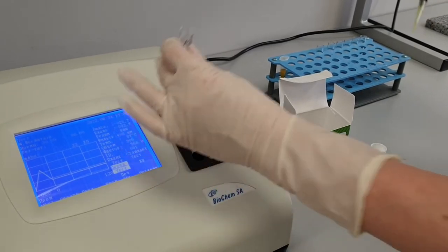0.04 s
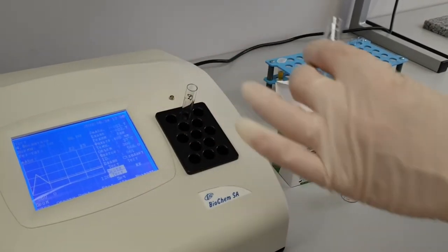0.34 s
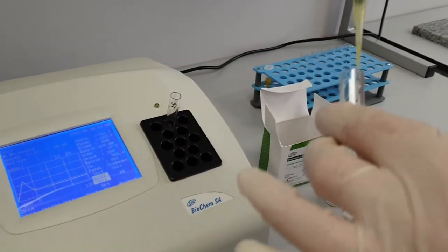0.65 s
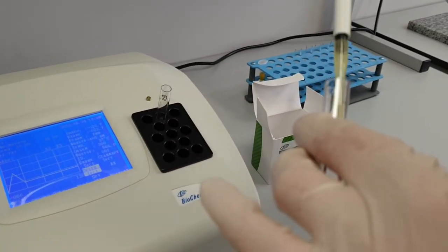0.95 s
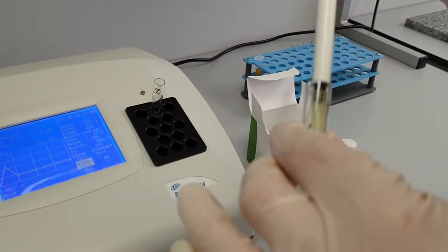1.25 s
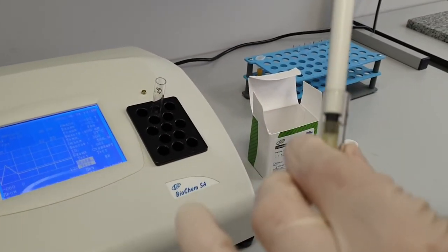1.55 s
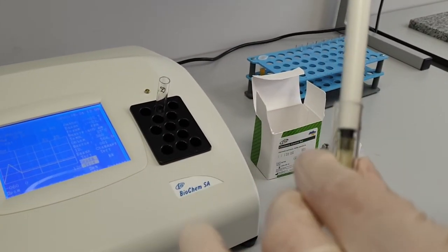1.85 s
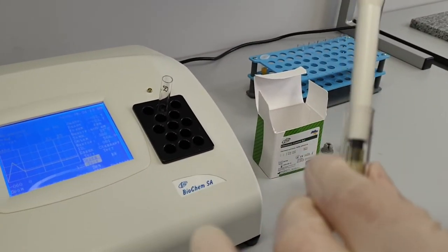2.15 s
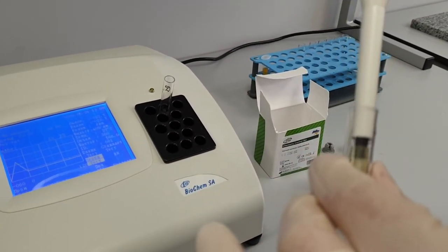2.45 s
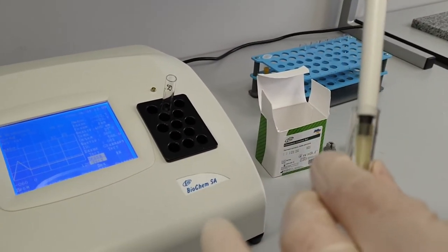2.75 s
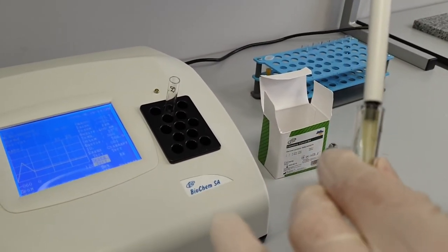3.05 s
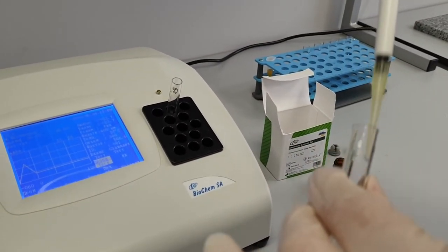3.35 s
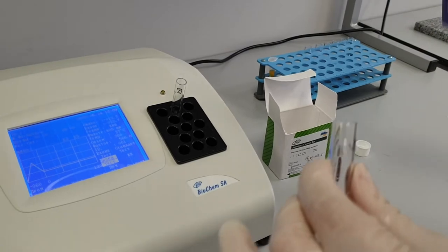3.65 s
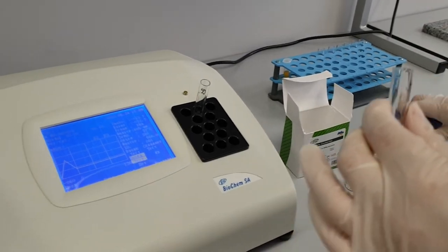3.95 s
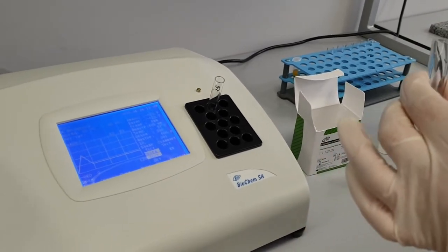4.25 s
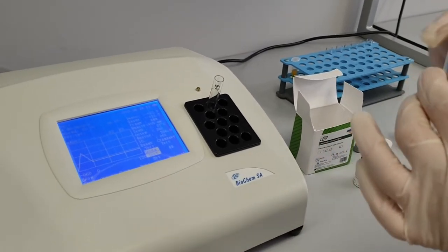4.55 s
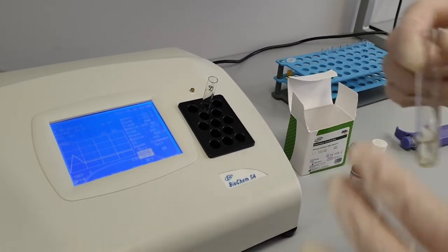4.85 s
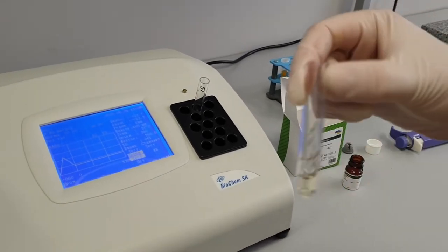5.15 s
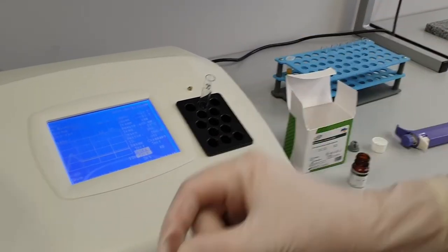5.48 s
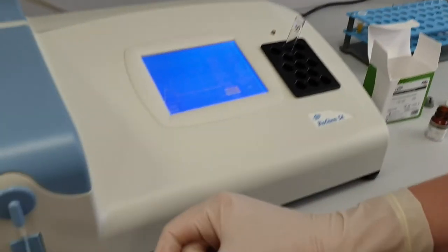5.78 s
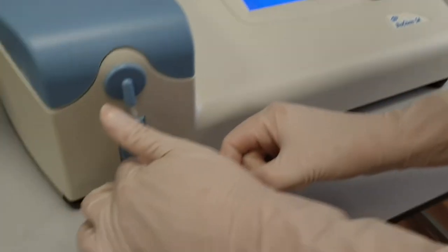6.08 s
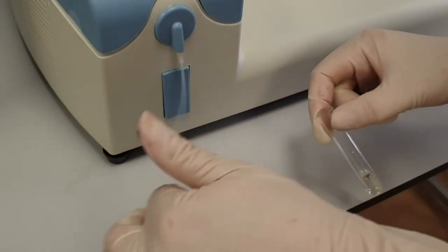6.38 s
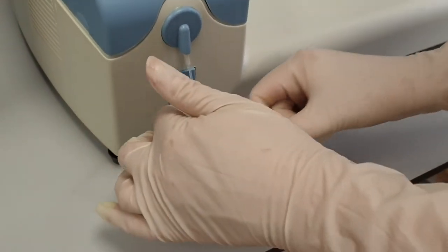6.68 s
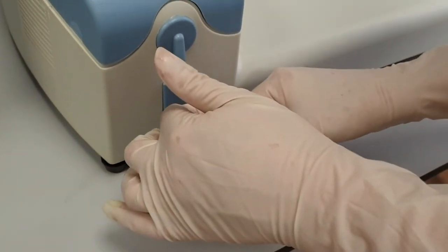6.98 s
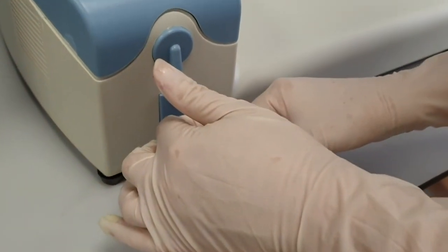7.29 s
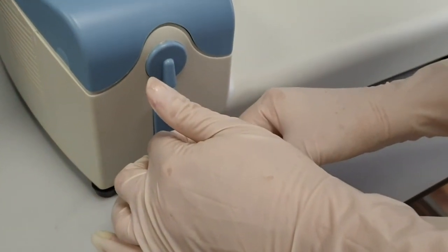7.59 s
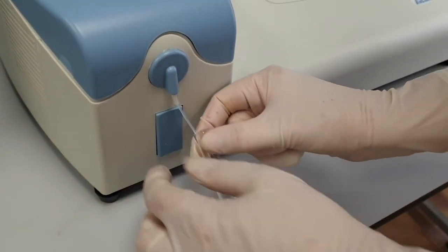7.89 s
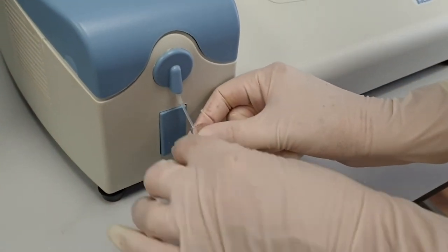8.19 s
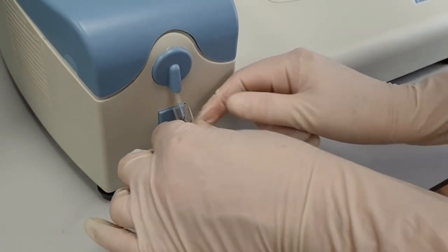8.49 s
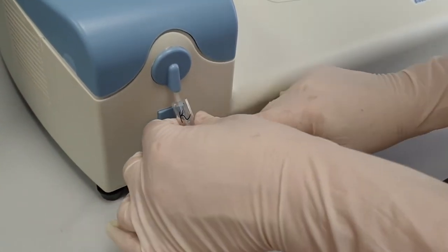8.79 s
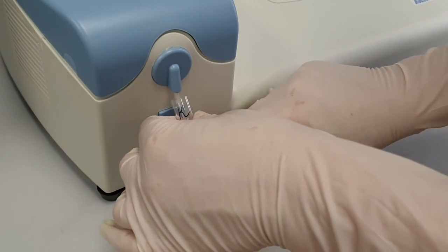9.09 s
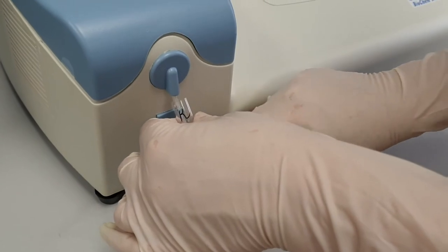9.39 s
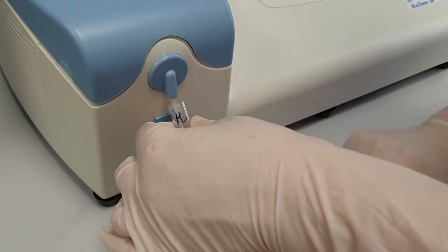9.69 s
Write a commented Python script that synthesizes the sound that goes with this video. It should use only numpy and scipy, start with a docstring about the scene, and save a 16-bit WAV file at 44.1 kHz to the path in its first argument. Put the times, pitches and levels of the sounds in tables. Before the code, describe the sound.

A laboratory analyser hums steadily over its fan in a small, hard room. Sleeves swish and a glass tube tinks faintly. A plastic pipette clicks several times, then drops on the bench with a sharp clatter, the loudest sound. Soft arm bumps and faint latex rubbing follow, with a knock on the machine's plastic casing and a cluster of knocks near the end, all close to a stereo microphone.

```python
"""A pipette in gloved hands at a laboratory bench, close to a stereo microphone in a small, hard room.
It touches a glass tube, its plunger clicks and it drops on the bench; later the tube and fingers knock on
an analyser's plastic casing. Each blow is a brief clatter plus the object's ring, and the walls answer.
Sleeves swish and latex rubs by friction; behind it all the analyser's motor hums over its fan."""
import sys
import numpy as np
from scipy import signal
from scipy.fft import rfft, irfft, next_fast_len
from scipy.io import wavfile
from scipy.ndimage import uniform_filter1d

SR = 44100
rng = np.random.default_rng(int(sys.argv[2]) if len(sys.argv) > 2 else 0)


def wav_out(sig):
    """Save sig, one row per channel (or a flat mono array), as 16-bit PCM at SR to the path in sys.argv[1]."""
    wavfile.write(sys.argv[1], SR, np.round(np.clip(np.atleast_2d(sig).T, -1, 1) * 32767).astype(np.int16))


N = 429093
TIME = np.arange(N) / SR
IMPACT_GAIN = np.sqrt(SR / 100)  # gives a unit-energy sound the energy of 10 ms at unit power

# the pipette on the bench, close to the microphone: start_s, level_db, cutoff_hz
PIPETTE_LANDINGS = [(4.1572, -37, 850), (4.168, -38, 539), (4.2115, -14.5, 15000), (4.42, -54, 493)]
# the bench top's clatter: frequency_hz, level_db
BENCH_CLATTER = [(80, -23), (170, -3.5), (450, -3), (800, -1), (1700, -3), (2400, -5), (4600, -10.5),
                 (6200, -14.5), (11500, -18), (16000, -23.5)]
# its ring: pitch_hz, level_db, t60_s
BENCH_RING = [(143, -14, 0.21), (290, -7.5, 0.11), (415.2, 0.5, 0.12), (589, -10.5, .07),
              (836, -0.5, 0.083), (927, -7, 0.064), (1480, -8, .07), (1683, -4.5, .08), (4650, -9, .03)]
def pipette_drop():
    """The pipette lands on the bench top and rocks to rest."""
    return blows(PIPETTE_LANDINGS, BENCH_CLATTER, BENCH_RING, low_t60=0.061, high_t60=0.042, rise_s=.001,
                 ring_pan_db=0.5, ring_db=-2.5, soft_ring_db=13.5, dulling_db=0.54, room_db=-6.0)


# plunger clicks and light taps of plastic, close up: start_s, level_db, cutoff_hz
PLUNGER_CLICKS = [(0., -48.5, 3780), (1.106, -66, 8000), (1.229, -62.5, 5500), (1.5116, -64, 15000),
                  (3.2766, -55, 8500), (3.3416, -53, 9400), (3.397, -49.5, 15000), (3.4661, -31.5, 15000),
                  (4.0852, -49.5, 14100), (4.1298, -51.5, 13500), (4.158, -37.5, 13500),
                  (6.3853, -38.5, 13200), (8.3465, -58, 16060), (8.5171, -56.5, 13000), (9.1012, -46, 4120)]
# the pipette's clatter: frequency_hz, level_db
PIPETTE_CLATTER = [(150, -20), (650, -10.5), (1000, -14.5), (2300, -4.5), (6000, -0.5), (9500, -6),
                   (12500, -2.5), (16000, -8.5)]
# its ring: pitch_hz, level_db, t60_s
PIPETTE_RING = [(1350, 1, 0.045), (2260, -1.5, 0.18), (2436, 1, .2), (2640, 0, 0.29), (3430, -5.5, 0.042),
                (4920, 1.5, .04), (5710, 0, .05)]
def pipette_clicks():
    """Small plastic parts strike with a bright snap and a faint ring."""
    return blows(PLUNGER_CLICKS, PIPETTE_CLATTER, PIPETTE_RING, low_t60=.055, high_t60=.034,
                 rise_s=0.00033, ring_pan_db=-1.5, ring_db=-12, soft_ring_db=0.5, dulling_db=2.5,
                 room_db=-8.5)


# knocks on the analyser beside the hands: start_s, level_db, cutoff_hz
CASING_KNOCKS = [(5.953, -55, 1700), (6.389, -36.5, 1004), (9.1015, -47, 1800), (9.3465, -28.5, 13500),
                 (9.488, -41, 700), (9.4915, -40, 11900), (9.537, -47.5, 500)]
# the casing's clatter: frequency_hz, level_db
CASING_CLATTER = [(70, -19), (300, -3.5), (580, -7), (780, 0.5), (1750, -0.5), (2100, -9), (3400, -9.5),
                  (4900, -18.5), (7300, -6.5), (9000, -16), (11500, -11.5), (16000, -28)]
# its ring: pitch_hz, level_db, t60_s
CASING_RING = [(167, -16, 0.24), (327, -32, .1), (374, -1, 0.11), (413.2, 2, 0.14), (797, -2, 0.12),
               (880, -5.5, 0.041), (955, -8, 0.042), (1800, -6.5, 0.07)]
def casing_knocks():
    """Tube and fingers set the analyser's plastic casing ringing."""
    return blows(CASING_KNOCKS, CASING_CLATTER, CASING_RING, low_t60=0.14, high_t60=0.042, rise_s=0.0006,
                 ring_pan_db=2, ring_db=-2.5, soft_ring_db=5, dulling_db=0.35, room_db=-7.0)


# where the hands work, seen from the microphone: time_s, left_minus_right_db
HAND_POSITION = [(3.5, -1), (4.2, 1), (8.5, 3), (9.4, -1.5)]
SOFT_HZ, HARD_HZ = 503, 14000  # contact cut-offs: a soft one favours the ring, a hard one adds no tilt
FAINT_WETNESS = .13  # dB more room for each dB that a blow is fainter
def blows(hits, colour, modes, low_t60, high_t60, rise_s, ring_pan_db, ring_db, soft_ring_db,
          dulling_db, room_db):
    """Each blow is a clatter, dying first in the treble, plus a ring; returns (direct, sent to room)."""
    direct, sent = np.zeros((2, 2, N))
    loudest_db = max(hit[1] for hit in hits)
    for start_s, db, cutoff_hz in hits:
        tilt_db = dulling_db * np.log2(cutoff_hz / HARD_HZ)
        ring_gain = undb(ring_db + soft_ring_db * (SOFT_HZ / cutoff_hz) ** 2)
        def force_db(hz):
            """A soft, long contact wakes the high modes less."""
            return tilt_db * np.log2(hz) - 10 * np.log10(1 + (hz / cutoff_hz) ** 8)
        t60s = [(400, low_t60), (4000, high_t60)]
        clatter = dying_noise(lambda hz: along(colour, hz) + force_db(hz), t60s)
        tone = ring([(hz, mode_db + force_db(hz), t60) for hz, mode_db, t60 in modes])
        contact = onset(clatter, rise_s) * undb(db) * IMPACT_GAIN
        clatter *= contact
        tone *= contact * ring_gain * panned(ring_pan_db)
        pan_db = np.interp(start_s, *np.transpose(HAND_POSITION))
        add(direct, start_s, (clatter + tone) * panned(pan_db))
        # an object's loudest blows are nearest the microphone, so they are also the driest
        wet = undb(room_db + FAINT_WETNESS * (loudest_db - db))
        add(sent, start_s, from_all_sides(clatter) * wet)
        add(sent, start_s, tone * wet)
    return np.array([direct, sent])


# the tube, a little to the right, rising in pitch as it fills:
# start_s, pitch_hz, level_db, strongest_multiple
TUBE_TOUCHES = [(1.229, 1220, -57.5, 1), (3.116, 1270, -60.5, .6), (5.1429, 1426, -52.5, 5),
                (8.516, 1540, -74, 1)]
# its air column favours the odd overtones: pitch_multiple, level_db, t60_s
TUBE_OVERTONES = [(1, 1, 0.054), (2, -12, 0.033), (3, -5, 0.042), (5, -8, 0.028)]
TINK_FALL_DB = 8  # per octave away from the strongest multiple
def glass_tinks():
    """Fingers damp the tube, so each overtone of a tink is a brief, blurred cluster of close modes."""
    out = np.zeros((2, N))
    for start_s, pitch, db, strongest in TUBE_TOUCHES:
        modes = []
        for multiple, mode_db, t60 in TUBE_OVERTONES:
            overtone_db = mode_db - TINK_FALL_DB * abs(np.log2(multiple / strongest))
            for blur, blur_db in [(1, -3.5), (.97, -3), (1.035, -6.5)]:
                modes.append((pitch * multiple * blur, overtone_db + blur_db, t60))
        add(out, start_s, undb(db) * ring(modes))
    return out * panned(-2.5) * IMPACT_GAIN


# hands and forearms bumping the bench and casing: start_s, level_db, t60_s
ARM_BUMPS = [(0.339, -45, 0.19), (.49, -46, 0.17), (5.62, -42, 0.64), (5.96, -42, 0.13), (9.491, -33, 0.05)]
# their dull thud: frequency_hz, level_db
THUD_SPECTRUM = [(50, -30), (90, 8), (160, -1.5), (250, -0.5), (500, -16), (2000, -64)]
def arm_thumps():
    """Flesh on a heavy surface: only the lowest modes answer, and they start softly."""
    out = np.zeros((2, N))
    for start_s, db, t60 in ARM_BUMPS:
        thud = dying_noise(lambda hz: along(THUD_SPECTRUM, hz), [(100, t60)])
        add(out, start_s, undb(db) * thud * onset(thud, rise_s=0.0025))
    return out * IMPACT_GAIN


# sleeves moving near the microphone: peak_s, rise_s, fall_s, level_db
SLEEVE_SWEEPS = [(.35, 0.22, 0.19, -58.5), (.37, 0.026, .045, -55.5), (3.8, 0.21, 0.25, -67.5),
                 (4.847, 0.038, 0.039, -68), (5.2, .11, .11, -68), (5.62, 0.13, 0.3, -52.5),
                 (6.34, 0.12, .1, -58.5), (6.65, .15, 0.16, -69), (8.37, 0.059, 0.059, -64.5),
                 (8.537, 0.08, 0.098, -62.5)]
# the hiss of cloth: frequency_hz, level_db
CLOTH_SPECTRUM = [(70, 17), (250, 5.5), (600, 9), (1100, 3.5), (1800, 2), (2800, 0.5), (4500, 5), (7300, 8),
                  (9000, -2.5), (12500, 4.5), (16000, -4.5)]
SWISH_TILT_DB = -1.08  # per octave, for a slow sweep
FLICK_S, FLICK_TILT_DB = .07, 3  # a flick this short is brighter by this much per octave
def sleeves():
    """Cloth moves through the air in broad swishes, brighter when brisk."""
    out = 0
    for peak_s, rise_s, fall_s, db in SLEEVE_SWEEPS:
        tilt_db = SWISH_TILT_DB + FLICK_TILT_DB * (FLICK_S / (rise_s + fall_s)) ** 2
        colour = lambda hz: undb(along(CLOTH_SPECTRUM, hz) + tilt_db * np.log2(hz + 1))
        out += undb(db) * noise_swell(peak_s, rise_s, fall_s, colour, grain_db=0.5)
    return out


# the fading ring of a tapped glass tube (first two rows), then the pipette tip squeaking on the glass:
# peak_s, pitch_hz, level_db
GLASS_RING_AND_SQUEAKS = [(-.02, 3680, -58), (-.02, 7450, -69), (1.145, 3780, -71.5), (1.41, 7350, -73),
                          (1.565, 4480, -73.5)]
def glass_ring_and_squeaks():
    """The tube's ring and the tip's squeaks are narrow bands of noise that die away."""
    return narrow_swells(GLASS_RING_AND_SQUEAKS, rise_s=0.049, fall_s=0.12, width=.075, grain_db=3.0)


# the gloves, faint even this close: peak_s, pitch_hz, level_db
GLOVE_RUBS = [(4.644, 5900, -72), (5.068, 6000, -69), (7.974, 6560, -73), (8.282, 6800, -73),
              (8.57, 4600, -72.5), (8.74, 6300, -74.5), (9.75, 4700, -64.5)]
def gloves():
    """Latex rubs, catching and slipping as the grip changes."""
    return narrow_swells(GLOVE_RUBS, rise_s=.095, fall_s=.095, width=0.26, grain_db=2.0)


# the analyser's motor and overtones, just left of centre: pitch_hz, level_db
MOTOR_TONES = [(49.1, -49.5), (245.6, -63.5), (344.5, -68.5), (393, -68.5), (491.3, -65), (552, -80),
               (886, -79), (2363, -89.5), (2421, -93)]
# its fan and the ventilation: frequency_hz, level_db
FAN_SPECTRUM = [(25, -24), (65, -1), (100, -4.5), (150, -2.5), (270, -0.5), (370, -9), (560, -16),
                (980, -18), (1140, -29), (1370, -27), (1900, -33), (2600, -32.5), (4500, -36.5),
                (8800, -46), (12500, -36.5), (16000, -40)]
# the microphone moves round the analyser's side, which screens the overtones: time_s, gain_db
SIDE_SCREENING = [(5.5, -0.5), (6.3, -3)]
FAN_DB = -57.5
def analyser():
    """A motor hums with wavering overtones over the rush of its fan."""
    hz, noise = stereo_noise(N)
    rush = unit(irfft(noise * undb(along(FAN_SPECTRUM, hz)), N)) * np.sqrt(N)
    rush *= undb(FAN_DB + 0.63 * wander(2.7))
    shaft_time = TIME + np.cumsum(0.003 * wander(4)) / SR
    screening_db = np.interp(TIME, *np.transpose(SIDE_SCREENING))
    hum = 0
    for pitch, db in MOTOR_TONES:
        # the shaft tone is nearly steady; the overtones flutter with the air flow
        flutter_db = min(pitch / 80, 1.3) * wander(6.4)
        gain = undb(db + flutter_db + min(pitch / 350, 1) * screening_db)
        hum += gain * np.sin(2 * np.pi * (pitch * shaft_time + rng.random()))
    return (rush + hum) * panned(0.76)


# the small laboratory around the microphone: frequency_hz, t60_s
ROOM_DECAY = [(100, 0.66), (500, 0.47), (2000, 0.53), (6000, 0.49), (14000, 0.31)]
def room(x):
    """Hard walls and shelves return a dense tail a few milliseconds after the direct sound."""
    walls = [(100, -2.0), (1500, 4.0), (6000, 0), (14000, -1)]  # frequency_hz, level_db
    tail = dying_noise(lambda hz: along(walls, hz), ROOM_DECAY)
    build_up = 1 - np.exp(-(TIME[:tail.shape[1]] / 0.0052) ** 2)
    return signal.fftconvolve(x, unit(tail * build_up), axes=1)[:, :N]


def from_all_sides(x):
    """The walls hear an object from every side, so the fine peaks of its clatter even out."""
    spectrum = rfft(x)
    power = abs(spectrum) ** 2 + 1e-18
    smoothed = abs(uniform_filter1d(power, size=201, axis=1))
    return irfft(spectrum * np.sqrt(smoothed / power))[:, :x.shape[1] // 2]


def narrow_swells(rows, rise_s, fall_s, width, grain_db):
    """Short swells of noise, each through one resonance whose width is a share of its pitch."""
    out = 0
    for peak_s, pitch, db in rows:
        resonance = lambda hz: 1 / (1 + ((hz / pitch - 1) / width) ** 2)
        out += undb(db) * noise_swell(peak_s, rise_s, fall_s, resonance, grain_db)
    return out


def noise_swell(peak_s, rise_s, fall_s, gain_at, grain_db):
    """Coloured noise with an uneven grain under a smooth rise and fall."""
    size = next_fast_len(int(2.5 * (rise_s + fall_s) * SR))
    hz, noise = stereo_noise(size)
    hiss = unit(irfft(noise * gain_at(hz), size)) * np.sqrt(size)
    t = (np.arange(size) - size * rise_s / (rise_s + fall_s)) / SR
    swell = np.exp(-.8 * (t / np.where(t < 0, rise_s, fall_s)) ** 2)
    grain = np.interp(t, np.linspace(-1, 1, 400), rng.standard_normal(400))
    out = np.zeros((2, N))
    add(out, peak_s + t[0], hiss * swell * undb(grain_db * grain))
    return out


def dying_noise(db_at, t60s, size=32768):
    """Countless overlapping modes: third-octave bands of coloured noise, each with its own decay."""
    hz, noise = stereo_noise(size)
    colour, octave = undb(db_at(hz + 1)), np.log2((hz + 1) / 1000)
    t, out = TIME[:size], 0
    for centre in np.arange(-12, 13) / 3:
        band = colour * (abs(octave - centre) < 1 / 6)
        fade = undb(-60 * t / along(t60s, 1000 * 2 ** centre))
        out += np.linalg.norm(band) * unit(irfft(noise * band) * fade)
    return unit(out)


def ring(modes, size=32768):
    """Damped sines; the higher they are, the more their phase differs between left and right."""
    t, out = TIME[:size], 0
    for hz, db, t60 in modes:
        phase = rng.uniform(-1, 1, (2, 1)) * min(hz / 600, np.pi / 2)
        detuned = hz * (1 + 0.0047 * rng.standard_normal())
        out += undb(db) * unit(np.sin(2 * np.pi * detuned * t + phase) * undb(-60 * t / t60))
    return unit(out)


def stereo_noise(size):
    """Noise spectra at the microphone's two ports: alike in the bass, unrelated in the treble."""
    hz = np.fft.rfftfreq(size, 1 / SR)
    alike = 0.94 / (1 + (hz / 900) ** 2)
    mid, side = rfft(rng.standard_normal((2, size)))
    return hz, mid * np.sqrt(1 + alike) + side * np.sqrt(1 - alike) * np.array([[1], [-1]])


def onset(sound, rise_s):
    """The rise of a contact, as long as the sound."""
    return 1 - np.exp(-TIME[:sound.shape[1]] / rise_s)


def wander(rate_hz):
    """A slow random drift with a spread near 1."""
    return np.interp(TIME * rate_hz, np.arange(200), rng.standard_normal(200))


def undb(db):
    """Decibels to gain."""
    return 10 ** (np.asarray(db) / 20)


def along(points, hz):
    """Read (frequency_hz, value) points on a log-frequency axis."""
    at, value = np.transpose(points)
    return np.interp(np.log(hz + 1), np.log(at), value)


def unit(x):
    """Scale to unit energy per channel, on average."""
    return x / np.sqrt(np.sum(x ** 2) / 2)


def panned(pan_db):
    """Gains of the left and right channel."""
    return undb(np.array([[pan_db], [-pan_db]]) / 2)


def add(out, start_s, sound):
    """Mix a sound in at a time."""
    start = int(start_s * SR)
    sound, start = sound[:, max(-start, 0):], max(start, 0)
    out[:, start:start + sound.shape[1]] += sound[:, :max(N - start, 0)]


def scene():
    """Everything that reaches the microphone; only the blows and tinks ring in the room."""
    direct, sent = pipette_drop() + casing_knocks() + pipette_clicks()
    tinks = glass_tinks()
    impacts = direct + tinks + arm_thumps()
    reverberation = room(sent + undb(-9) * tinks)
    handling = sleeves() + gloves() + glass_ring_and_squeaks()
    return impacts + reverberation + handling + analyser()


# balance of the microphone's two ports: frequency_hz, left_minus_right_db
PORT_BALANCE = [(100, 1.5), (400, -1), (1000, 4), (2000, 1.5), (12000, -0.5)]
TOP_HZ = 16200
def record(dry):
    """The two ports colour the sound a little differently; the recorder cuts the top steeply."""
    size = next_fast_len(N + SR)
    balance_db = along(PORT_BALANCE, np.fft.rfftfreq(size, 1 / SR))
    port_gains = undb(np.array([balance_db, -balance_db]) / 2)
    heard = irfft(rfft(dry, size) * port_gains, size)[:, :N]
    return signal.sosfilt(signal.ellip(10, .2, 80, TOP_HZ, fs=SR, output="sos"), heard)


dry = scene()
out = record(dry)
wav_out(out)
```